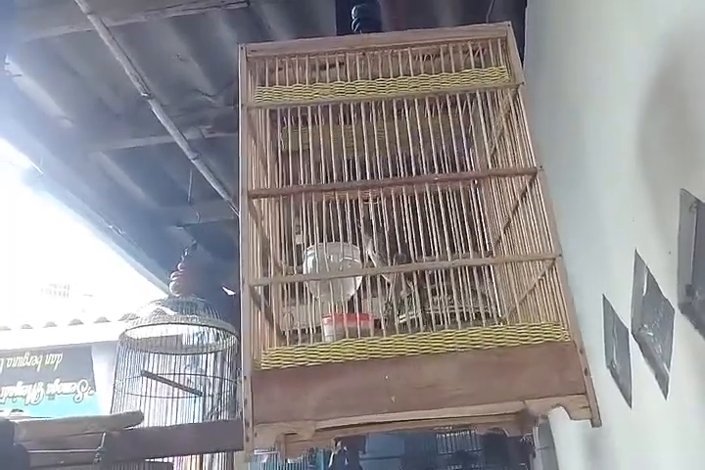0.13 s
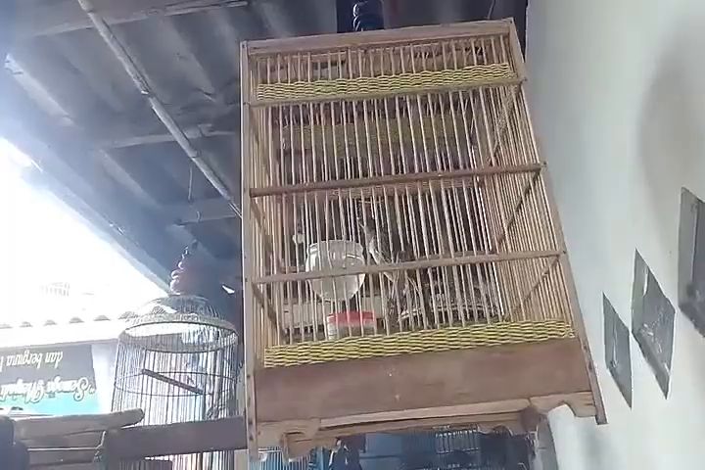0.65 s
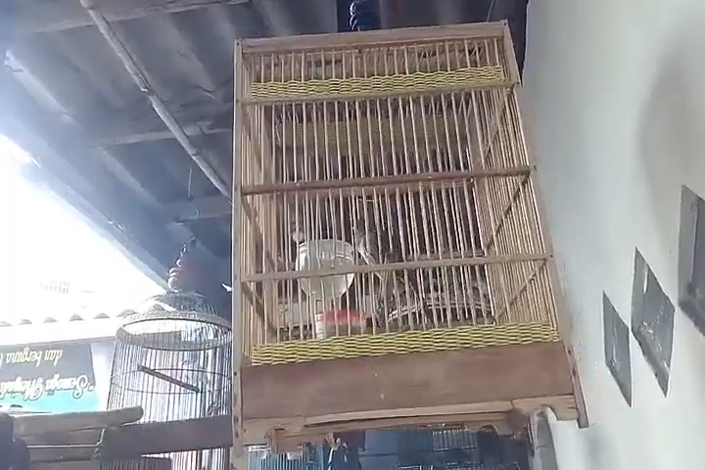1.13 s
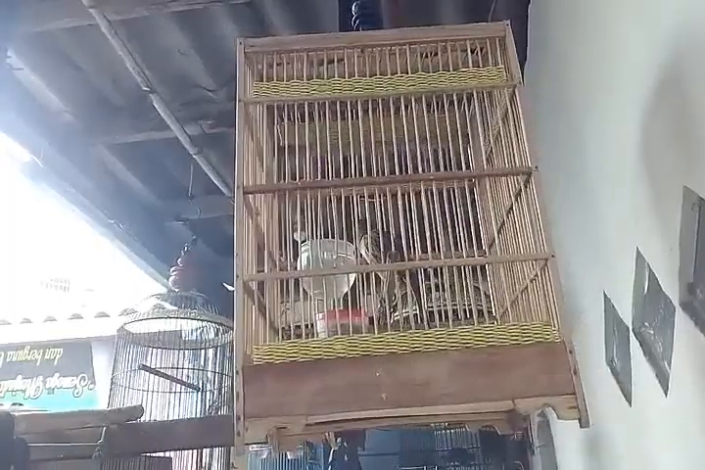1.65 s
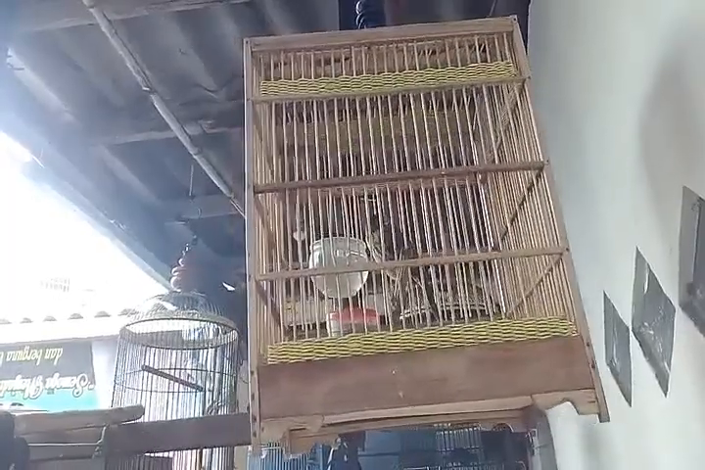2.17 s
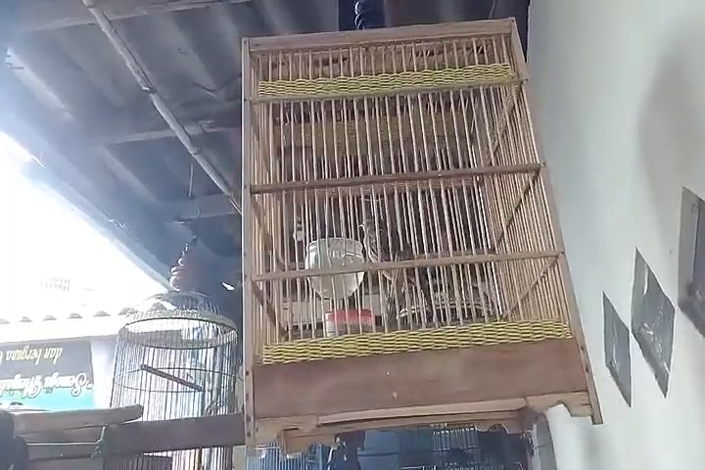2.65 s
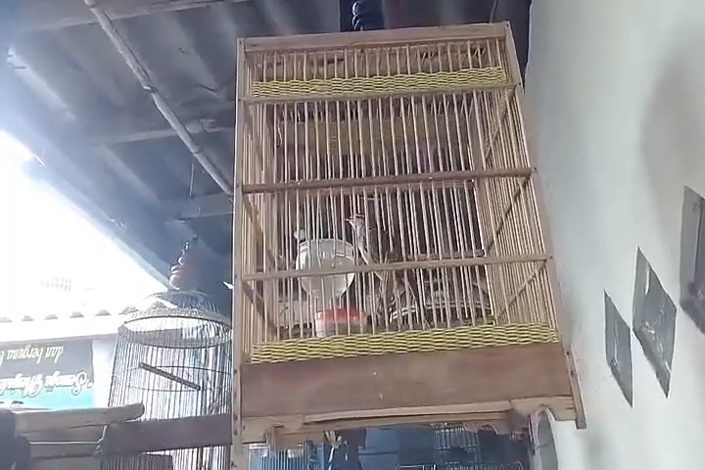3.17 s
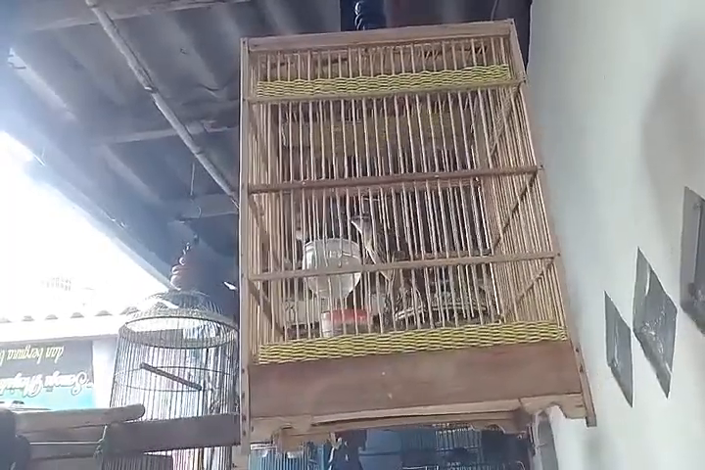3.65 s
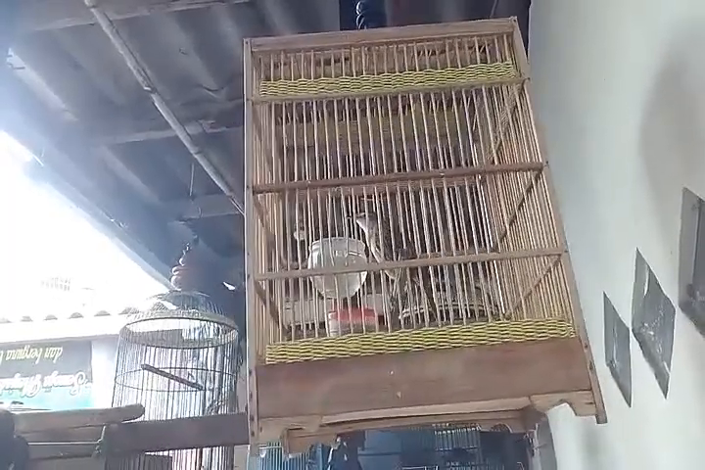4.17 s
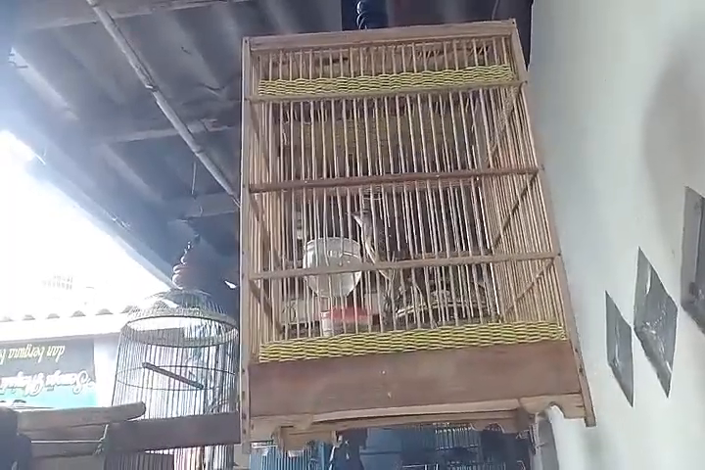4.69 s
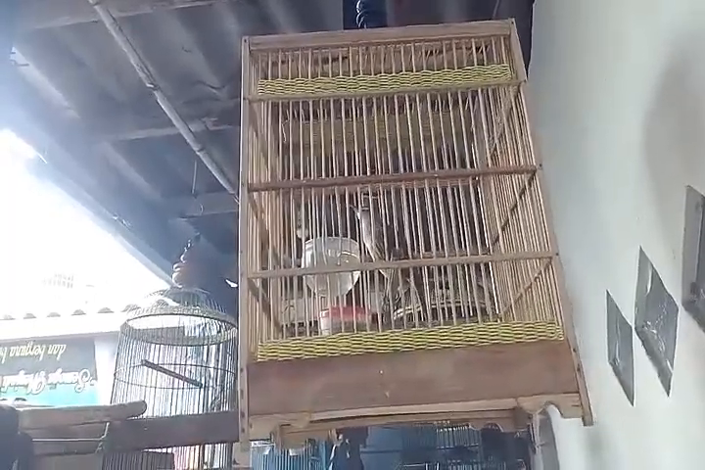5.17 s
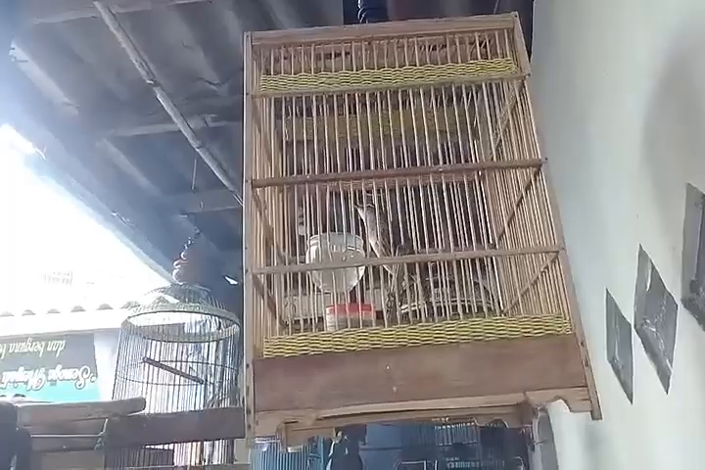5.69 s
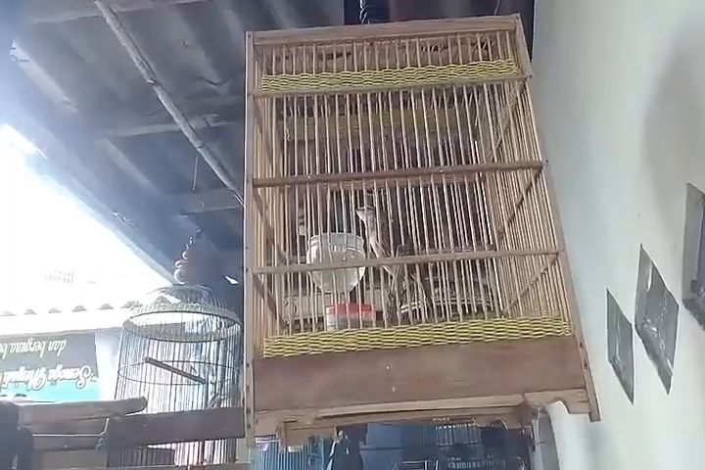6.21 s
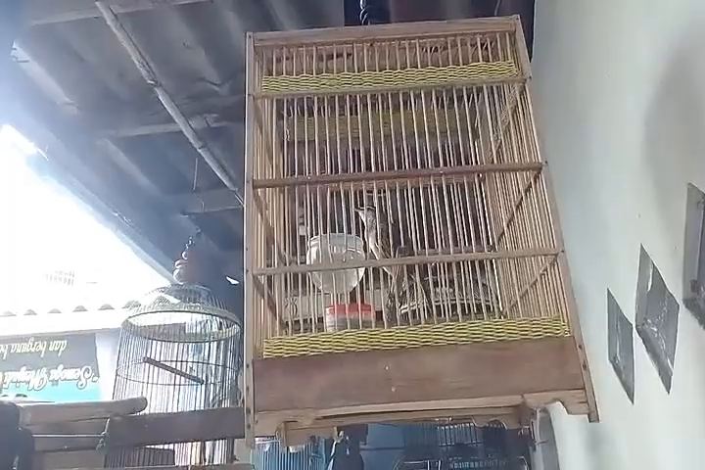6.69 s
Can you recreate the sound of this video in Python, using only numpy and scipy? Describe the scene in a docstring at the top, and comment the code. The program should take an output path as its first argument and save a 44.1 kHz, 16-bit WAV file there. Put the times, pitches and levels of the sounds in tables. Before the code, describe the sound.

Short bright chirps repeat over very quiet street noise; a nasal squawk answers once, and rapid high notes and falling whistles come at the end.

```python
"""A caged songbird chirps under a tin roof beside a wall; its voice is a near-sine with faint, rough overtones.
Partway, a neighbour answers with a rising nasal call of strong overtones that ends in a squawk; late on come sharp
high notes and fast song phrases of whistles, a throbbing buzz and falling glides. Hard surfaces add discrete early
echoes and a short diffuse tail. Throughout, far birds and tones (blurred glides) lie with street noise, hiss,
light wind (filtered noise) and a low hum (wavering sines) below."""
import sys
import numpy as np
from scipy import signal
from scipy.io import wavfile

SR = 44100
rng = np.random.default_rng(int(sys.argv[2]) if len(sys.argv) > 2 else 0)


def invert_db(x):
    """Field ratio 10**(x/20) for x, a level in decibels (scalar or array-like)."""
    u = np.asarray(x, float) / 20
    return 10 ** u


def waveform_to_disk(signal):
    """Save audio, clipped to [-1, 1], as 16-bit WAV at the path in sys.argv[1]."""
    frames = np.transpose(np.atleast_2d(signal))
    scaled = np.clip(frames, -1, 1) * 32767
    samples = np.round(scaled).astype(np.int16)
    wavfile.write(sys.argv[1], SR, samples)


N = 300762

# Chirps of the near bird. Each row: onset in seconds, level in dB, held pitch in Hz,
# level of the second half in dB relative to the first.
CHIRP_NOTES = [(0.293, -11, 2750, -5), (.766, -10, 2751, -7.5), (1.208, -10, 2744, -12),
               (1.749, -11.5, 2792, -7), (2.685, -12, 2655, -5), (3.142, -10.5, 2725, -5),
               (3.579, -11, 2703, -2.5), (4.223, -11.5, 2684, -5), (5.158, -12, 2730, -5),
               (5.791, -11, 2717, -9.5)]
# Levels of the overtones of the singing voice: multiples 1, 2, 3 of the pitch, in dB.
SONG_OVERTONES_DB = [-3.5, -31.5, -37]
# Warble depth of each kind of note, as a share of its pitch.
WARBLE_DEPTH = {"whistle": .006, "second half": .017, "buzz": .07, "nasal": .012, "squawk": .045, "strand":
                .01, "drop": .04, "tone": .007, "far call": .025, "chatter": .15}


def at_hz(points, hz):
    """Linear interpolation of a (Hz, value) table on a logarithmic frequency axis."""
    table_hz, values = np.transpose(points)
    return np.interp(np.log(hz), np.log(table_hz), values)


def rms_one(x):
    """Normalization of the mean power to one."""
    return x / np.sqrt(np.mean(x ** 2) + 1e-20)


def wander(rate, size, count=1):
    """Low-passed Gaussian noise of rms 1: a random modulation whose speed follows rate (Hz)."""
    pole = np.exp(-3 * np.pi * rate * count / SR)
    low_pass = [[1, 0, 0, 1, -2 * pole, pole * pole]] * 2
    noise = rng.standard_normal(size // count + 1502)
    slow = rms_one(signal.sosfilt(low_pass, noise)[1500:])      # the filter has settled
    return np.interp(np.arange(size) / count, np.arange(len(slow)), slow)


def add_note(out, rows, voice_db, warble_hz, rasp_db, breath):
    """Source-filter voice: the syrinx gives a gliding harmonic series, the windpipe weights each overtone."""
    # Windpipe resonance. Each row: frequency in Hz, gain in dB.
    windpipe = [(1200, -7.5), (2800, -0.5), (4200, 4), (5600, -2), (9000, -5.5), (15000, -5.5),
                (19000, -62)]
    overtone_rasp_db = 18       # overtones flutter more than the fundamental
    s, pitch, level_db, depth = np.transpose(rows)
    at = np.arange(max(int(s.min() * SR), 0), min(int(s.max() * SR), N))
    t = at / SR
    warble = np.interp(t, s, depth) * wander(warble_hz, len(at))
    hz = np.interp(t, s, pitch) * (1 + warble)
    phase = 2 * np.pi * (np.cumsum(hz) / SR + rng.random())
    tone = 0
    for k, db in enumerate(voice_db):
        turbulence = wander(1100.0, len(at))
        flutter = 1 + invert_db(rasp_db + (k > 0) * overtone_rasp_db) * turbulence
        gain = invert_db(db + at_hz(windpipe, (k + 1) * hz))
        tone = tone + gain * flutter * np.sin((k + 1) * phase)
    edges = np.minimum(1, np.minimum(t - t[0], t[-1] - t) / .001)       # 1 ms fades
    out[at] += invert_db(np.interp(t, s, level_db)) * edges * (tone + breath[:len(at)])


def phrases(notes, voice_db, warble_hz, rasp_db, breath_db):
    """Superposition of all notes of one voice, each with band-limited turbulence noise of the breath."""
    # Band of the air rushing through the beak: lower and upper edge in Hz.
    breath_band = [3100, 5900]
    out = np.zeros(N)
    band = signal.butter(4, breath_band, "band", fs=SR, output="sos")
    air = invert_db(breath_db) * signal.sosfilt(band, rng.standard_normal(2 * SR))
    for rows in notes:
        add_note(out, rows, voice_db, warble_hz, rasp_db, air[rng.integers(SR):])
    return out


def glide(s, length, start_hz, end_hz, db, depth):
    """Linear frequency sweep under a soft-edged envelope; equal ends give a steady pitch."""
    return [(s + length * u, start_hz + (end_hz - start_hz) * u, db + d, depth)
            for u, d in [(0, -17), (.15, 6), (.8, 5), (1, -14)]]


def sung(rows, depth):
    """Pitch and level contour with a swell before it, a release after it and random frequency modulation."""
    attack_s, release_s, edge_db = .006, .0091, -33     # the outer ends lie edge_db below the contour's ends
    (s, hz, db), (end_s, end_hz, end_db) = rows[0], rows[-1]
    start = (s - attack_s, hz, db + edge_db)
    end = (end_s + release_s, end_hz, end_db + edge_db)
    return [(*row, depth) for row in [start, *rows, end]]


def chirp(s, db, hz, second_db):
    """Frequency modulation of a chirp: a quick rise to the held pitch, then a slightly higher second half."""
    # First half. Each row: seconds after onset, pitch relative to the held pitch, level in dB.
    rise = [(0, .7, -22), (.0015, .82, -5), (.003, .95, -0.5), (.006, 1.0, 0), (.014, 1.01, 0.5),
            (.017, 1.02, -10)]
    # Second half. Each row: seconds after onset, pitch relative to the held pitch, level in dB.
    second = [(.024, 1.03, -1.5), (.032, 1.06, -3.5), (.042, 1.07, -6), (.050, 1.03, -11.5),
              (.058, 1.0, -31)]
    first_half = [(s + t, hz * p, db + d, .004) for t, p, d in rise]
    second_half = [(s + t, hz * p, db + second_db + d, WARBLE_DEPTH["second half"]) for t, p, d in second]
    return first_half + second_half


def chirps():
    """Nearly pure tones: the overtones of the clear voice lie far below its fundamental."""
    # Levels of multiples 1, 2, 3, .. of the pitch, in dB.
    clear_db = [-1, -30, -44, -55, -53]
    notes = [chirp(*row) for row in CHIRP_NOTES]
    return phrases(notes, clear_db, warble_hz=151, rasp_db=-39.0, breath_db=-28.0)


def strands_and_flares():
    """Short sweeps from the other side of the syrinx, and the second harmonic flaring as each chirp rises."""
    # Strands. Each row: start in seconds, length in seconds, start pitch in Hz, end pitch in Hz, level in dB.
    strands = [(.336, 0.015, 2546, 2417, -36), (1.221, 0.01, 4500, 3190, -39),
               (2.706, 0.013, 3408, 3310, -40), (2.718, 0.0068, 2497, 1929, -36.5),
               (3.602, 0.01, 3760, 3120, -35.5), (3.617, .012, 2380, 2310, -30.5),
               (4.238, 0.0093, 3118, 3100, -34), (6.202, 0.01, 3640, 3594, -38.5)]
    # Second-harmonic flare: seconds after chirp onset, length in seconds, start pitch in Hz, end pitch in Hz,
    # level in dB relative to the chirp.
    flare = (-.001, .005, 3300, 4900.5, -28.5)
    flares = [(s + flare[0], *flare[1:4], db + flare[4]) for s, db, *_ in CHIRP_NOTES]
    notes = [glide(*row, WARBLE_DEPTH["strand"]) for row in strands + flares]
    return phrases(notes, [0], warble_hz=200, rasp_db=-23.0, breath_db=-28.0)


def buzz():
    """Amplitude modulation: an unsteady throb roughens a strongly warbled phrase."""
    # Each row: time in seconds, pitch in Hz, level in dB.
    contour = [(6.522, 2966, -15.5), (6.532, 2488, -12.5), (6.548, 2720, -20), (6.580, 2650, -21),
               (6.600, 2725, -16.5), (6.615, 2883, -16), (6.627, 3230, -11)]
    pulses_per_s, pulse_depth = 160, .6
    rate = pulses_per_s * (1 + 0.2002 * wander(29.9, N, count=50))
    throb = 1 + pulse_depth * np.sin(2 * np.pi * np.cumsum(rate) / SR)
    notes = [sung(contour, WARBLE_DEPTH["buzz"])]
    return throb * phrases(notes, SONG_OVERTONES_DB, warble_hz=253, rasp_db=-32.5, breath_db=-28.5)


def whistles():
    """Clear song whistles: falling sweeps with weak overtones and little frequency modulation."""
    # Each row: start in seconds, length in seconds, start pitch in Hz, end pitch in Hz, level in dB.
    whistle_rows = [(6.181, 0.024, 3244, 3017, -14), (6.201, 0.03, 3101, 2836, -14.5),
                    (6.663, .018, 3882, 3775, -14), (6.684, 0.0048, 4700, 4360, -20.5)]
    notes = [glide(*row, WARBLE_DEPTH["whistle"]) for row in whistle_rows]
    return phrases(notes, SONG_OVERTONES_DB, warble_hz=200, rasp_db=-38, breath_db=-26)


def drop(s, length, start_hz, end_hz, db):
    """Nonlinear downward sweep with deep random frequency modulation."""
    # Each row: share of the length, share of the way down, level in dB.
    shape = [(0, 0.06, -23), (.16, .08, -1.5), (.3, .42, -0.5), (.45, .8, -4.5), (.65, .9, -6),
             (0.901, 1.0, -10), (1, 0.97, -40)]
    return [(s + length * u, start_hz + (end_hz - start_hz) * p, db + d, WARBLE_DEPTH["drop"])
            for u, p, d in shape]


def drops():
    """Rough downward sweeps that close chirps and phrases; fundamental and a weak second harmonic."""
    # Each row: start in seconds, length in seconds, start pitch in Hz, end pitch in Hz, level in dB.
    drop_rows = [(.341, 0.04, 2770, 2310, -48), (1.26, 0.034, 2724, 2284, -47),
                 (1.8, 0.046, 2750, 1395, -19.5), (2.732, 0.053, 2766, 1878, -43.5),
                 (3.185, 0.044, 2753, 1940, -37.5), (3.636, .049, 2700, 1900, -47),
                 (4.277, 0.04, 2708, 2004, -43), (5.206, 0.045, 2710, 1200, -24),
                 (5.839, 0.051, 2735, 1275, -24), (6.230, 0.044, 2840, 1377, -20),
                 (6.685, .026, 3995, 1827, -14.5)]
    notes = [drop(*row) for row in drop_rows]
    return phrases(notes, [0, -34], warble_hz=198, rasp_db=-31.5, breath_db=-33)


def high_notes():
    """Sharp high notes: fast frequency contours blurred by random modulation."""
    # Each note: warble depth as a share of pitch, then rows of time in seconds, pitch in Hz, level in dB.
    contours = [(0.037, [(5.628, 5365, -25), (5.632, 5586, -17), (5.645, 5280, -14.5), (5.662, 5267, -23)]),
                (0.024, [(6.156, 5900, -20), (6.159, 5895, -16.5), (6.162, 5450, -18), (6.165, 4770, -17),
                (6.180, 4656, -26.5)]), (.04, [(6.590, 4300, -27), (6.599, 5550, -19), (6.605, 6570, -12.5),
                (6.612, 6626, -22), (6.617, 5450, -20), (6.632, 5200, -29)])]
    # Levels of multiples 1, 2, 3 of the pitch, in dB.
    high_db = [-1.5, -23.5, -27]
    notes = [sung(rows, depth) for depth, rows in contours]
    return phrases(notes, high_db, warble_hz=264, rasp_db=-20.5, breath_db=-43)


def neighbour():
    """Nasal timbre: the second harmonic exceeds the fundamental in a rising call and its closing squawk."""
    # Rising call. Each row: time in seconds, pitch in Hz, level in dB.
    call = [(3.006, 2059, -40.5), (3.022, 2272, -25.5), (3.048, 2415, -27), (3.080, 2397, -28),
            (3.105, 2405, -21.5), (3.138, 2498, -30)]
    # Harsh squawk. Each row: time in seconds, pitch in Hz, level in dB.
    squawk = [(3.143, 2650, -15.5), (3.155, 2734, -18.5), (3.164, 2634, -14.5), (3.170, 2250, -21),
              (3.178, 1850, -27.5), (3.190, 1750, -31)]
    # Levels of multiples 1, 2, 3, .. of the pitch, in dB.
    nasal_db = [-6, -0.5, -11, -21, -24, -43]
    notes = [sung(call, WARBLE_DEPTH["nasal"]), sung(squawk, WARBLE_DEPTH["squawk"])]
    return phrases(notes, nasal_db, warble_hz=124, rasp_db=-39.5, breath_db=-45.5)


def faint_sounds():
    """Faint tones and calls; deeper random frequency modulation spreads a tone toward noise."""
    # Steady far tones. Each row: start in seconds, length in seconds, pitch in Hz, level in dB.
    far_tones = [(.29, 0.12, 1000, -54.5), (0.657, .1, 4063, -52.5), (0.696, .12, 5480, -44),
                 (.84, 0.097, 6210, -63.5), (.87, 0.048, 4445, -53), (.89, .14, 1172, -62.5),
                 (1.40, 0.21, 1260, -67.5), (3.30, 0.26, 898, -61.5), (3.30, 0.57, 3895, -63),
                 (3.36, 0.57, 1948, -57.5), (3.74, 0.58, 990, -61.5), (3.74, 0.25, 2668, -57),
                 (4.10, 0.18, 2930, -63.5), (4.15, 0.37, 1146, -64), (4.15, 0.64, 691, -66),
                 (4.44, 0.077, 2270, -54), (4.45, .22, 1363, -72), (4.76, 0.14, 4510, -78),
                 (4.76, 0.12, 2405, -73), (4.85, 0.25, 654.5, -63)]
    # Blurred far calls, two of them low coos; the first rows are the fading tail of an earlier near chirp.
    # Each row: start in seconds, length in seconds, start pitch in Hz, end pitch in Hz, level in dB.
    blurred_calls = [(0, 0.012, 2784, 2890, -49), (.04, .2, 2460, 2500, -68.5),
                     (0.502, 0.11, 1004, 828, -63.5), (0.645, 0.14, 2956, 3020, -53.5),
                     (0.685, 0.12, 4500, 4600, -57), (.88, 0.11, 4920, 5050, -66.5),
                     (1.132, .07, 2164, 2308, -55), (1.156, 0.078, 2898, 3104, -45),
                     (1.282, .21, 248.1, 229, -53.5), (2.071, 0.3, 197.5, 276, -56.5),
                     (3.28, 0.088, 1467, 1600, -56.5), (3.812, 0.089, 1750, 1436, -53.5),
                     (4.579, 0.16, 2931, 2760, -65)]
    # Pitchless far chatter. Each row: start in seconds, length in seconds, centre in Hz, level in dB.
    chatter = [(0, 0.032, 2074, -58), (0.651, 0.2, 4956, -47.5), (0.839, 0.15, 3940, -61),
               (0.979, .12, 2125, -68.5), (1.13, 0.099, 3990, -62.5), (3.796, .08, 5900, -72)]
    notes = [glide(s, length, hz, hz, db, WARBLE_DEPTH["tone"]) for s, length, hz, db in far_tones]
    notes += [glide(*row, WARBLE_DEPTH["far call"]) for row in blurred_calls]
    notes += [glide(s, length, hz, hz, db, WARBLE_DEPTH["chatter"]) for s, length, hz, db in chatter]
    return phrases(notes, [0, -30], warble_hz=94.4, rasp_db=-17, breath_db=-33.5)


def space(direct_db, echo_db, tail_db, late_db):
    """Two-ear impulse response: direct sound, early reflections, exponential diffuse decay and a slower ring."""
    # Reverberation. Each row: frequency in Hz, time to decay by 60 dB in seconds.
    decay = [(800, 0.22), (1800, 0.24), (2800, 0.25), (5500, 0.25), (11000, .14)]
    # Reflections of wall, roof and floor. Each row: delay in seconds, left and right level in dB before echo_db.
    reflections = [(.0045, -14.5, -8), (.011, -18.5, -1), (.017, -6.5, -11.5), (.024, -15, -14),
                   (.036, -12.5, -15)]
    size = int(.5 * SR)
    t, out = np.arange(size) / SR, np.zeros((2, size))
    edges = 100 * 2. ** np.arange(0, 7.6, .75)
    for low, high in zip(edges, edges[1:]):
        sos = signal.butter(2, [low, high], "band", fs=SR, output="sos")
        band = signal.sosfilt(sos, rng.standard_normal((2, size)))
        t60 = at_hz(decay, np.sqrt(low * high))
        late_ring = invert_db(late_db - 60 * t / (1.96 * t60))        # the yard
        out += band * (invert_db(-60 * t / t60) + late_ring)
    out *= 1 - np.exp(-t / 0.0039)       # the diffuse field builds up
    out *= invert_db(tail_db) / np.sqrt(np.sum(out ** 2, axis=1, keepdims=True))
    for delay, left_db, right_db in reflections:
        out[:, int(delay * SR)] += invert_db(np.array([left_db, right_db]) + echo_db) * rng.choice([-1, 1], 2)
    out[[0, 1], [0, 3]] += invert_db(np.array(direct_db))     # the right side hears three samples later
    return out


def heard(x, response):
    """Convolution of a source with a two-ear impulse response."""
    return signal.oaconvolve(x[None], response, axes=1)[:, :N]


def banded_noise(spectrum, low_hz, count, patchy_db):
    """Partially coherent stereo noise in half-octave bands, each flickering in level; overall rms 1."""
    # Coherence. Each row: frequency in Hz, likeness of left and right.
    likeness = [(40, .6), (150, 0.73), (350, 0.77), (700, 0.52), (2000, 0.066), (8000, .05)]
    out, white = 0, rng.standard_normal((2, 2, N))
    edges = np.minimum(low_hz * 2 ** (np.arange(count + 1) / 2), .45 * SR)
    for k, (low, high) in enumerate(zip(edges, edges[1:])):
        sos = signal.butter(2, [low, high], "band", fs=SR, output="sos")
        mid, side = signal.sosfilt(sos, white[k % 2])
        hz = np.sqrt(low * high)
        alike = np.clip(at_hz(likeness, hz), 0, .99)
        gain = invert_db(at_hz(spectrum, hz) + patchy_db * wander(6.0, N, count=50))
        out = out + gain * (np.sqrt(1 + alike) * mid + np.sqrt(1 - alike) * side * [[1], [-1]])
    return rms_one(out)


def street():
    """Broadband traffic noise shaped mostly to low frequencies; its level comes and goes."""
    # Spectral density. Each row: frequency in Hz, relative level in dB per Hz.
    spectrum = [(15, -57), (25, -29.5), (48, -15.5), (92, -2), (152, -3.5), (203, -1.5), (353, -8.5),
                (638, -10), (749, -13), (1190, -15.5), (1800, -30), (2340, -57.5), (3960, -120)]
    # Each row: time in seconds, level in dB.
    traffic = [(0, -64), (1.6, -64.5), (2.7, -64.5), (3.1, -61.5), (3.85, -60), (4.05, -65), (6.82, -64)]
    s, db = np.transpose(traffic)
    level_db = np.interp(np.arange(N) / SR, s, db)
    noise = banded_noise(spectrum, low_hz=18, count=14, patchy_db=2.5)
    return invert_db(level_db) * noise * invert_db([[-.6], [.6]])       # a little stronger on the right


def treble_hiss():
    """Shaped high-frequency noise whose level swells, or once dips, along Gaussian curves."""
    # Spectral density. Each row: frequency in Hz, relative level in dB per Hz.
    spectrum = [(1200, -10.5), (1800, -4.5), (2500, 4), (3200, 0.5), (4500, -2.5), (6000, -5.5),
                (8000, -25), (11000, -34.5), (15000, -25), (17000, -37.5)]
    # Each row: centre in seconds, width in seconds, rise in dB.
    swells = [(0, 0.082, 5), (.6, 0.083, 2), (1.3, 0.076, -10.5), (1.75, 0.16, 5.5), (2.45, 0.25, 4),
              (3.85, 0.049, 11), (4.2, 0.056, 8), (4.78, 0.055, 5), (5.3, 0.85, 1)]
    t = np.arange(N) / SR
    level_db = -72.5 + sum(db * np.exp(-((t - s) / width) ** 2) for s, width, db in swells)
    return invert_db(level_db) * banded_noise(spectrum, low_hz=1200, count=8, patchy_db=1.2)


def hum():
    """Low hum as sines at steady pitch under random amplitude modulation."""
    # Each row: frequency in Hz, amplitude in dB before a half-decibel lift, wavering in dB.
    hum_tones = [(205, -69.5, 2), (305, -81, 2.5)]
    t, out = np.arange(N) / SR, 0
    for hz, db, waver_db in hum_tones:
        level = invert_db(db + 0.5 + waver_db * wander(2.5, N, count=50))
        out = out + level * np.sin(2 * np.pi * (hz * t + rng.random()))
    return out


def drone():
    """Narrow-band noise at low frequency under slow random amplitude modulation."""
    # Centre in Hz, width in Hz, level in dB before swelling, swell in dB, swell rate in Hz.
    hz, width_hz, db, swell_db, rate = (146.5, 23, -72.5, 5, 4.0)
    band = signal.butter(2, [hz - width_hz / 2, hz + width_hz / 2], "band", fs=SR, output="sos")
    noise = rms_one(signal.sosfilt(band, rng.standard_normal(N)))
    return invert_db(db + swell_db * wander(rate, N, count=50)) * noise


def wind():
    """Light wind as partly coherent low-frequency noise with random gusts."""
    # Upper band edge in Hz, level in dB before gusts, gust in dB, gust rate in Hz.
    top_hz, db, gust_db, rate = (50, -90.5, 5.5, 4.0)
    band = signal.butter(2, [18, top_hz], "band", fs=SR, output="sos")
    both, left, right = signal.sosfilt(band, rng.standard_normal((3, N)))
    noise = rms_one(both + .7 * np.array([left, right]))
    return invert_db(db + gust_db * wander(rate, N, count=50)) * noise


def scene():
    """Superposition of near bird, neighbour and faint sounds, each in its sound field, and the background."""
    near = chirps() + strands_and_flares() + buzz() + whistles()
    birds = heard(near, space([0, -6], echo_db=-2.5, tail_db=-7.0, late_db=-26.0))
    # low notes spread round the cage
    birds += heard(drops(), space([-6, -3], echo_db=-5.0, tail_db=-8.0, late_db=-26.5))
    birds += heard(high_notes() + neighbour(), space([-1.5, -6], echo_db=-13.0, tail_db=-3.0, late_db=-13.5))
    birds += heard(faint_sounds(), space([-7, -8], echo_db=-4.5, tail_db=-6.0, late_db=-14.5))
    return birds + street() + treble_hiss() + hum() + drone() + wind()


def band_limit(x):
    """A steep low-pass at the top of the band."""
    return signal.sosfilt(signal.butter(12, 16470, fs=SR, output="sos"), x)


def record(dry):
    """Steep low-pass filtering: the stop band, 70 dB down, begins at 16.2 kHz."""
    low_pass = signal.cheby2(12, 70, 16200, fs=SR, output="sos")
    mix = signal.sosfilt(low_pass, dry)
    return band_limit(mix)


dry = scene()
out = record(dry)
waveform_to_disk(out)
```